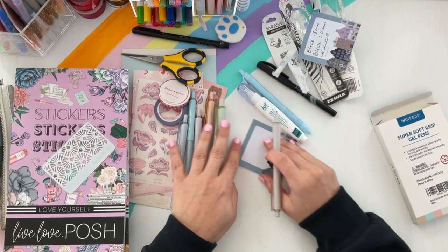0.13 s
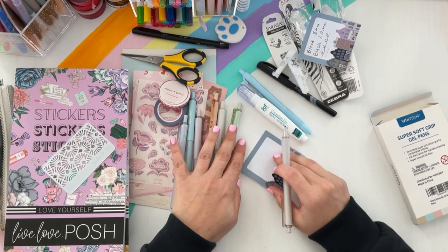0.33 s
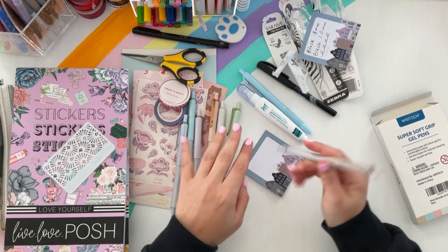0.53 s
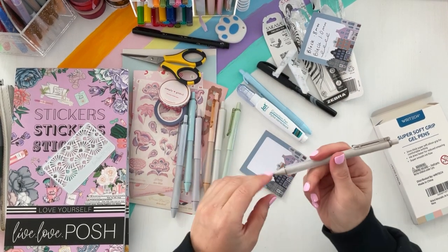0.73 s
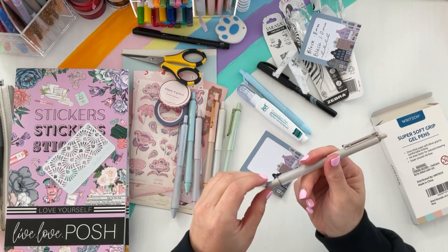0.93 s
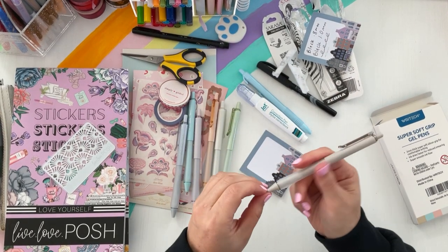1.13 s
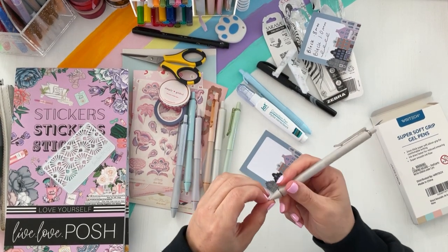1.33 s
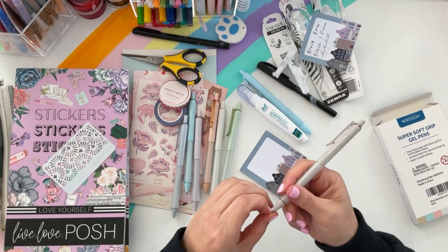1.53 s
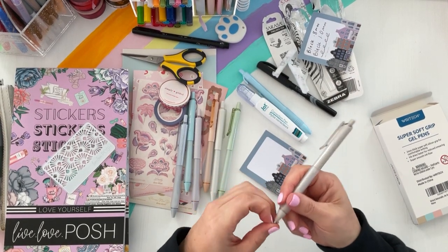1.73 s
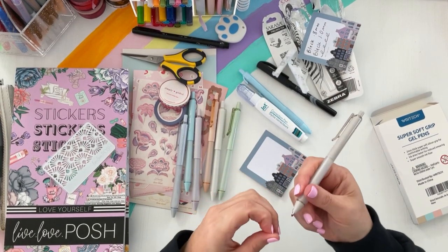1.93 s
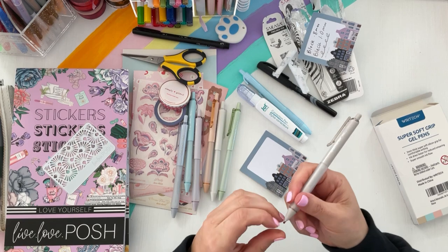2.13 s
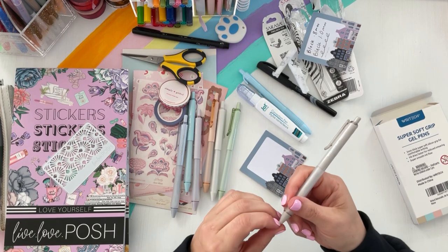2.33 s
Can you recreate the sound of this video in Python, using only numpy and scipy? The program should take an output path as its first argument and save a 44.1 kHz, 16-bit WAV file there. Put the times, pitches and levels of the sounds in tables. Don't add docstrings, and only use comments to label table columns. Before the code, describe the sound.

Sharp plastic clack of pens knocked on a desktop, followed by quiet handling in a room

```python
import sys
import numpy as np
from scipy import signal
from scipy.fft import rfft, irfft
from scipy.io import wavfile

SR = 44100
rng = np.random.default_rng(int(sys.argv[2]) if len(sys.argv) > 2 else 0)


def attenuation_scalar(level_db):
    decades = np.asarray(level_db, float) / 20
    return 10 ** decades


def log_audio(samples):
    frames = np.atleast_2d(samples).T
    limited = np.clip(frames, -1, 1)
    pcm = np.round(limited * 32767).astype(np.int16)
    wavfile.write(sys.argv[1], SR, pcm)


N = 105840

# f/Hz, density/dB
AIR_COLOUR = [(24, -41), (40, -16.5), (109, -0.5), (171, -5), (354, -4), (620, -16), (8340, -21.5),
              (13100, -24), (16000, -27.5)]
AIR_DB = -71
# f/Hz, width/Hz, rms level/dB
HUM_BANDS = [(77, 24, -78.5), (120, 7.4, -79), (165, 6.3, -81), (250, 30, -85), (353, 24, -78),
             (600, 14, -89.5)]
HUM_GROWTH_DB_PER_S = 4.5
MOTOR_HZ, MOTOR_DB, MOTOR_WAVER_DB, MOTOR_WAVER_HZ = 350, -81, 7, 7.8
# f/Hz, t60/s, level/dB
ROOM_BANDS = [(152, .3, 4.5), (330, 0.65, -0.5), (636, 0.59, -4.5), (944, 0.42, 13.5), (1360, 0.37, 3.5),
              (2102, 0.34, -8), (3500, .39, -3.5), (12000, .28, 0.5)]
ROOM_DB, ROOM_DELAY_S, ROOM_RISE_S = -14, 0.0039, 0.0023
# t/s, level/dB
SLEEVE_LEVEL = [
    (.56, -84.5),
    (.615, -69),
    (.65, -65),
    (.70, -66),
    (.77, -71.5),
    (.86, -81),
]
# f/Hz, density/dB
SLEEVE_COLOUR = [(500, -4), (1200, -2), (2200, -4), (3300, -1), (5000, 1.5), (8000, -5.5), (14000, -12)]
# t/s, length/s, rms level/dB, centre f/Hz, spread/octaves
SCUFF_EVENTS = [(.128, 0.018, -48, 1100, 0.48), (0.143, 0.046, -43.5, 4350, 1.5),
                (0.183, 0.014, -38, 2919, 0.75), (0.468, 0.044, -74.5, 4700, 0.11),
                (1.136, 0.035, -71.5, 5000, 0.43), (1.528, 0.024, -74.5, 5770, 0.32),
                (1.589, 0.024, -75.5, 2400, .13), (1.765, 0.013, -64, 2400, 0.14),
                (1.766, 0.016, -64, 4780, 0.25), (1.799, 0.037, -65.5, 5930, 1.33),
                (2.322, .05, -77.5, 1848, 0.074), (2.219, 0.3, -73.5, 381, 0.74),
                (0.621, 0.24, -70, 250, 0.6), (.68, 0.17, -60, 125, 0.16), (1.275, .04, -77.5, 600, 0.092),
                (1.468, 0.039, -76, 600, .1)]
# t/s, peak level/dB, f/Hz, rise/s, t60/s
DESK_THUDS = [(0, -50, 86, 0.0014, 0.017), (0.114, -47, 346, 0.0089, 0.0087),
              (0.1323, -31.5, 397, 0.0014, 0.013), (0.1508, -25, 669.3, 0.00045, 0.0049),
              (.153, -38.5, 271, 0.0046, 0.03), (.165, -42, 136.2, 0.007, 0.034),
              (.2025, -29, 630, 0.0007, 0.014), (0.201, -28.5, 239.5, 0.0023, 0.031),
              (.2215, -30.5, 449, 0.00081, 0.019), (0.219, -42.5, 126.7, 0.0077, 0.075),
              (0.32, -58.5, 207.5, 0.0083, 0.095), (0.704, -61.5, 120, 0.047, 0.38),
              (1.49, -60.5, 70.5, .02, 0.16), (1.598, -57, 242.1, .012, 0.13),
              (1.629, -64.5, 83, 0.011, 0.087), (1.7871, -52, 770, 0.00044, 0.0071),
              (1.788, -51.5, 477, 0.00096, 0.019), (1.797, -54.5, 122, 0.0077, .1),
              (1.806, -60.5, 80.3, 0.0095, 0.27), (2.21, -60, 350, 0.011, 0.087),
              (2.339, -64.5, 208.4, .02, 0.14), (2.349, -63.5, 80.4, 0.019, 0.19)]
DESK_LOWEST_HZ = 62
# t/s, level/dB
SLIDE_LEVEL = [
    (0, -51),
    (.128, -51),
]
# f/Hz, density/dB
SLIDE_COLOUR = [(120, -40.5), (200, -4), (360, -11), (647, -17.5), (1210, -3.5), (1870, -12), (2910, -0.5),
                (16000, -16)]
# t/s, peak level/dB, centre f/Hz, spread/octaves
FINGER_TICKS = [(.826, -58, 3280, .4), (1.1304, -49.5, 4000, .3), (1.1356, -48, 6460, 0.54),
                (1.1367, -46.5, 5900, 0.27), (1.1377, -45, 4600, .25), (1.1392, -63, 4800, 0.41),
                (1.1406, -49, 4665, .4), (1.1452, -57.5, 5500, 0.29), (1.2745, -56, 7987, 0.75),
                (1.5160, -61, 2400, 0.15), (1.5186, -47, 5600, .27), (1.5246, -54, 5797, .27),
                (1.7864, -47, 6000, 0.56), (1.7874, -43, 5170, 0.94), (1.7908, -50, 3500, 0.71),
                (1.7922, -50.5, 4000, .7), (1.7943, -33.5, 6300, 0.41), (1.7956, -45.5, 2687, .35),
                (1.7981, -49, 5500, 0.84), (1.8012, -50.5, 4480, 0.71), (2.247, -60, 4510, 0.69),
                (2.309, -55, 4465, .9)]
# t/s, peak level/dB, centre f/Hz, spread/octaves
PEN_CLATTER = [(.0057, -32, 9000, .45), (.0113, -32, 6000, .3), (.0117, -35.5, 3000, .25),
               (.063, -48, 1195, .15), (.1300, -30.5, 1380, .5), (.1335, -35.5, 900, .6),
               (.1357, -35.5, 1280, .5), (.1385, -38, 1000, .6), (.1498, -27.5, 5700, 0.15),
               (.1549, -26.5, 8500, 0.71), (.1575, -31, 8360, .4), (.1600, -35, 7524, .5),
               (.1657, -29, 5200, .3), (.1819, -27.5, 8713, .2), (.1852, -18.5, 5374, .95),
               (.1873, -28, 7990, .5), (.1900, -33.5, 7503, .4), (.1985, -34.5, 1600, .12),
               (.2012, -5.5, 5200, 0.77), (.2024, -2.5, 2174, 0.25), (.2034, -12.5, 3500, .6),
               (.2045, -17, 2500, .9), (.2052, -23, 7500, .5), (.2057, -14, 1450, 0.2),
               (.2095, -22, 1200, .5), (.2133, -28, 4500, .6), (.2145, -24.5, 2400, .3),
               (.2165, -26.5, 2400, .3), (.2192, -20, 3000, .7), (.2203, -18.5, 2200, .25),
               (.2236, -20.5, 1650, .3), (.2250, -23, 1500, .3), (.2273, -26, 1500, .6),
               (.2297, -26, 1489, .35), (.2375, -29.5, 1300, .3), (.2418, -29.5, 1800, .5),
               (.2460, -27, 1700, .5)]
# f/Hz, level/dB, t60/s
BARREL_MODES = [(920, -0.5, .01), (1450, -1, 0.0076), (1905, -0.5, .0055), (2240, 3.5, .005),
                (2880, -6, .006), (3850, -4, .006), (4335, 4, .006), (5220, 4, 0.0052), (5900, 2.5, .006),
                (6550, 1.5, .006), (7600, 0.5, .006), (8550, 1.5, 0.0099), (9700, 0.5, .008),
                (12800, 0.5, .005)]
UNEVEN_DB = 0.5
CRACK_DB, CRACK_T60_S = -11, 0.005
CHATTER_DB, CHATTER_T60_S = -22, 0.022
RISE_CYCLES = 0.45
MERGE_S = 0.004
RINGS_TO_ROOM_DB = -11


def rms_one(x):
    return x / np.sqrt(np.mean(x ** 2) + 1e-20)


def at_hz(points, hz, axis=1):
    table = np.array(points)
    return np.interp(np.log(hz), np.log(table[:, 0]), table[:, axis])


def near(hz, centre_hz, octaves):
    return np.exp(-0.5 * (np.log2(hz / centre_hz) / octaves) ** 2)


def highpass(x, order, hz):
    return signal.sosfilt(signal.butter(order, hz, "high", fs=SR, output="sos"), x)


def add(out, s, x):
    i = int(s * SR)
    out[i:i + len(x)] += x[:len(out) - i]


def drift(rate_hz):
    r = np.exp(-80 * np.pi * rate_hz / SR)
    white = rng.standard_normal(N // 40 + 2002)
    slow = signal.lfilter([1], [1, -2 * r, r * r], white)[2000:]
    return np.interp(np.arange(N) / 40, np.arange(len(slow)), rms_one(slow))


def bands(size):
    edges = 35 * 2 ** np.arange(0, 9.1, 0.5)
    white = rng.standard_normal((2, size))
    pairs = []
    for k, (lo, hi) in enumerate(zip(edges, edges[1:])):
        sos = signal.butter(2, [lo, hi], "band", fs=SR, output="sos")
        pairs.append((np.sqrt(lo * hi), signal.sosfilt(sos, white[k % 2])))
    return pairs


def hiss(colour, patchy_db, rate_hz):
    together = drift(rate_hz)
    lowest_hz = colour[0][0]
    out = np.zeros(N)
    for hz, noise in bands(N):
        below_db = 12 * max(0, np.log2(lowest_hz / hz))
        flicker_db = patchy_db * (0.5 * together + drift(rate_hz))
        out += noise * attenuation_scalar(at_hz(colour, hz) - below_db + flicker_db)
    return rms_one(out)


def stroke(rows, release_s):
    s, db = np.transpose(rows)
    t = np.arange(N) / SR
    release_db = 60 * np.maximum(t - s[-1], 0) / release_s
    return attenuation_scalar(np.interp(t, s, db) - release_db) * (t >= s[0])


def air():
    return attenuation_scalar(AIR_DB) * hiss(AIR_COLOUR, patchy_db=1.27, rate_hz=2.7)


def hum():
    out = np.zeros(N)
    for hz, width_hz, db in HUM_BANDS:
        r = np.exp(-np.pi * width_hz / SR)
        poles = [1, -2 * r * np.cos(2 * np.pi * hz / SR), r * r]
        once = signal.lfilter([1, 0, -1], poles, rng.standard_normal(N + SR))
        out += attenuation_scalar(db) * rms_one(signal.lfilter([1], poles, once)[SR:])
    return out * attenuation_scalar(HUM_GROWTH_DB_PER_S * (np.arange(N) / SR - 2.0))


def motor():
    turns = np.cumsum(MOTOR_HZ + MOTOR_WAVER_HZ * drift(4.9)) / SR
    return attenuation_scalar(MOTOR_DB + MOTOR_WAVER_DB * drift(9.0)) * np.sin(2 * np.pi * turns)


def room(x):
    t = np.arange(SR) / SR
    tail = np.zeros(SR)
    for hz, noise in bands(SR):
        tail += noise * attenuation_scalar(at_hz(ROOM_BANDS, hz, axis=2) - 60 * t / at_hz(ROOM_BANDS, hz))
    tail *= 1 - np.exp(-t / ROOM_RISE_S)
    tail /= np.sqrt(np.sum(tail ** 2))
    tail = np.r_[np.zeros(int(ROOM_DELAY_S * SR)), tail]
    return attenuation_scalar(ROOM_DB) * signal.fftconvolve(x, tail)[:N]


def sleeve():
    return stroke(SLEEVE_LEVEL, release_s=0.091) * hiss(SLEEVE_COLOUR, patchy_db=1.6, rate_hz=17.0)


def scuffs():
    out, size = np.zeros(N), 16384
    f = np.maximum(np.fft.rfftfreq(size, 1 / SR), 20)
    white = rng.standard_normal((len(SCUFF_EVENTS), 2, size))
    for (s, length_s, db, centre_hz, spread), (a, b) in zip(SCUFF_EVENTS, white):
        grains = a * np.abs(b)
        rub = irfft(rfft(grains) * near(f, centre_hz, max(spread, 0.05)))
        phase = np.minimum(np.arange(size) / SR / length_s, 1)
        add(out, s, attenuation_scalar(db) * rms_one(rub) * np.sin(np.pi * phase ** 0.84))
    return out


def desk():
    out, t = np.zeros(N), np.arange(SR // 3) / SR
    for s, db, hz, rise_s, t60_s in DESK_THUDS:
        shape = attenuation_scalar(-60 * t / t60_s) * (1 - np.exp(-t / rise_s))
        add(out, s, attenuation_scalar(db) * shape / shape.max() * np.sin(2 * np.pi * hz * t))
    return out


def slide():
    return stroke(SLIDE_LEVEL, release_s=0.22) * hiss(SLIDE_COLOUR, patchy_db=1.37, rate_hz=40.0)


def pens(hits):
    out, t = np.zeros((2, N)), np.arange(2048) / SR
    mode_hz, mode_db, t60_s = np.transpose(BARREL_MODES)
    decay = attenuation_scalar(-60 * np.outer(t, 1 / t60_s))
    dying = attenuation_scalar(CRACK_DB - 60 * t / CRACK_T60_S) + attenuation_scalar(CHATTER_DB - 60 * t / CHATTER_T60_S)
    f = np.maximum(np.fft.rfftfreq(len(t), 1 / SR), 20)
    luck = rng.standard_normal((len(hits), 3, len(mode_hz)))
    white = rng.standard_normal((len(hits), len(t)))
    for (s, db, centre_hz, spread), (uneven, detune, sign), noise in zip(hits, luck, white):
        octaves = max(spread, 0.1)
        rise = 1 - np.exp(-t / (RISE_CYCLES / centre_hz))

        gain = attenuation_scalar(mode_db + UNEVEN_DB * uneven) * near(mode_hz, centre_hz, octaves) * np.sign(sign[0])
        tones = np.sin(2 * np.pi * np.outer(t, mode_hz * (1 + 0.015 * detune)))
        rings = rise * ((tones * decay) @ gain)

        colour = near(f, centre_hz, octaves)
        crack = rms_one(irfft(rfft(noise) * colour)) * dying * rise
        crack /= (rise * dying / dying[0]).max()

        knock = rings / np.abs(rings).max() + crack
        knock = attenuation_scalar(db) * knock / np.abs(knock).max()
        add(out[0], s, knock)

        pulse = rms_one(np.roll(irfft(colour), 64)) * knock.std()
        merged_s = np.floor(s / MERGE_S + 0.75) * MERGE_S - 0.002
        add(out[1], merged_s, pulse)
    return highpass(out, 2, 500)


def scene():
    knocks, pulses = pens(PEN_CLATTER) + pens(FINGER_TICKS)
    soft = highpass(desk() + scuffs(), 2, DESK_LOWEST_HZ)
    rubbing = slide() + sleeve()
    background = air()
    wet = room(soft + pulses + attenuation_scalar(RINGS_TO_ROOM_DB) * knocks)
    background = background + hum() + motor()
    return (knocks + soft + wet + rubbing + background)[None]


def band_limit(x):
    return signal.sosfilt(signal.butter(12, 17010, fs=SR, output="sos"), x)


def record(dry):
    limited = signal.sosfilt(signal.cheby2(12, 80, 18200, fs=SR, output="sos"), dry)
    return band_limit(highpass(limited, 4, 55))


dry = scene()
out = record(dry)
log_audio(out)
```